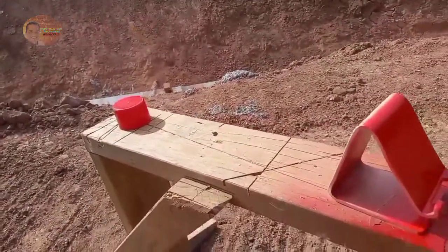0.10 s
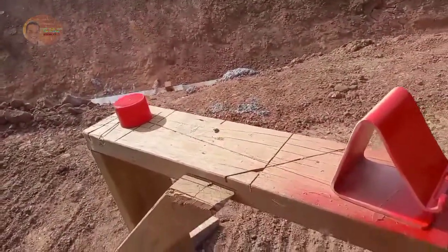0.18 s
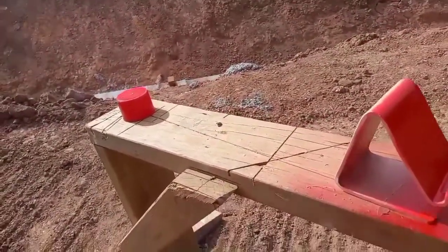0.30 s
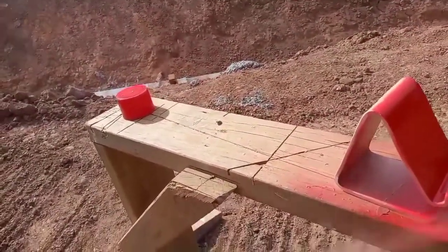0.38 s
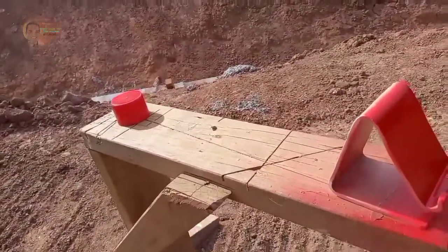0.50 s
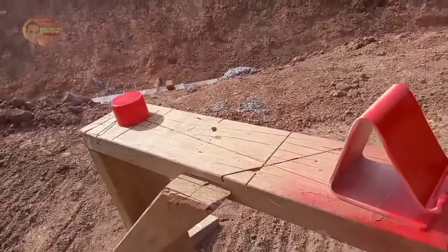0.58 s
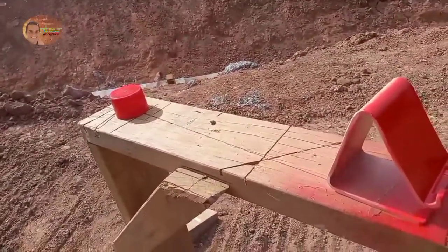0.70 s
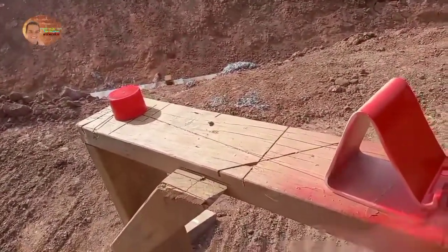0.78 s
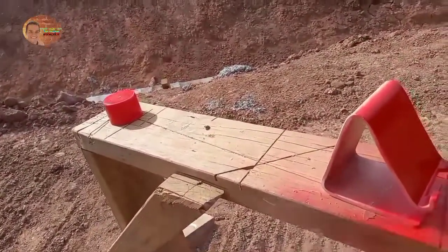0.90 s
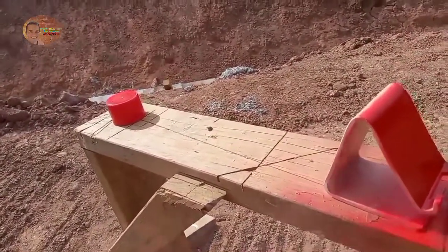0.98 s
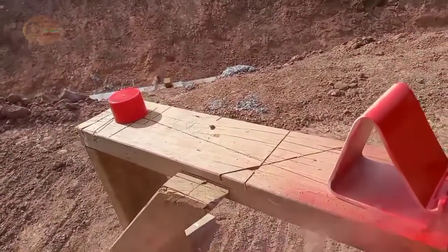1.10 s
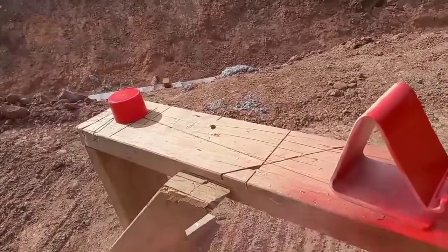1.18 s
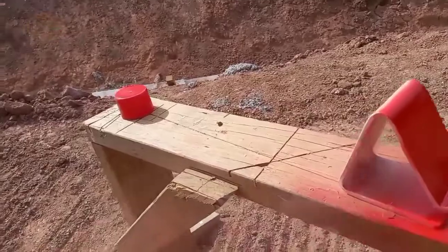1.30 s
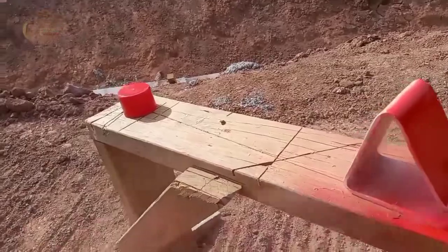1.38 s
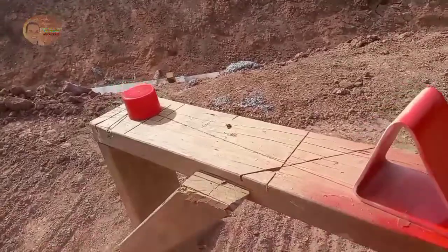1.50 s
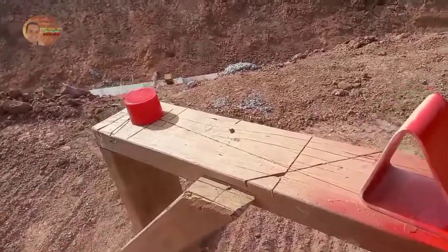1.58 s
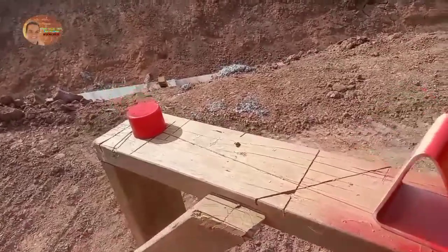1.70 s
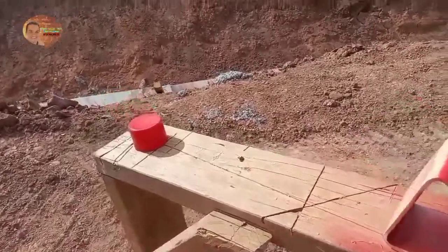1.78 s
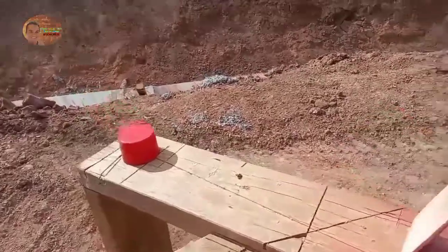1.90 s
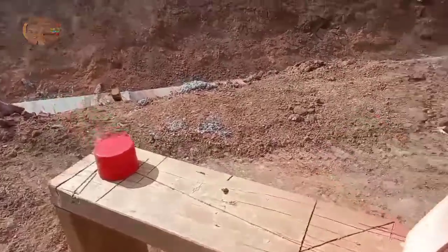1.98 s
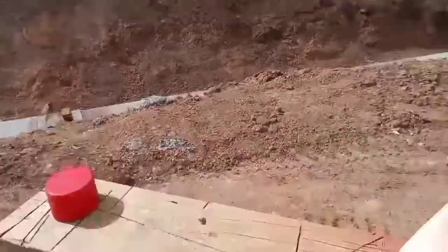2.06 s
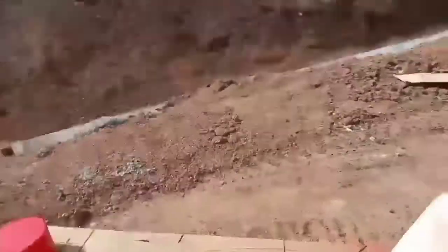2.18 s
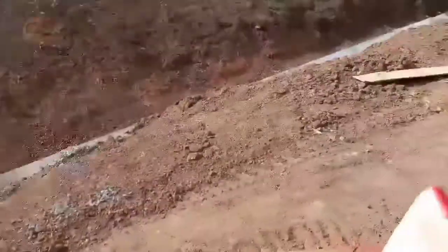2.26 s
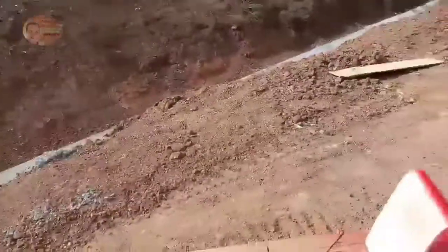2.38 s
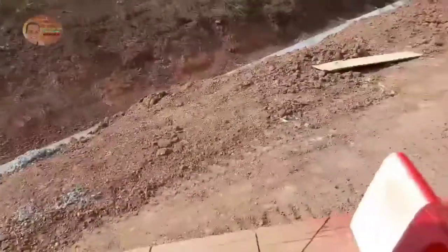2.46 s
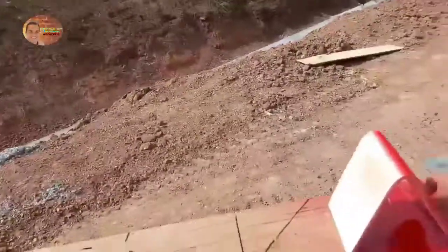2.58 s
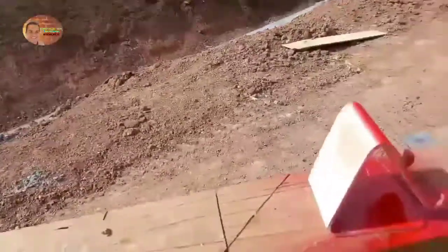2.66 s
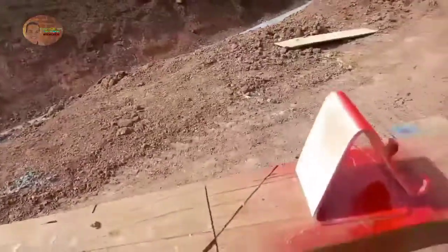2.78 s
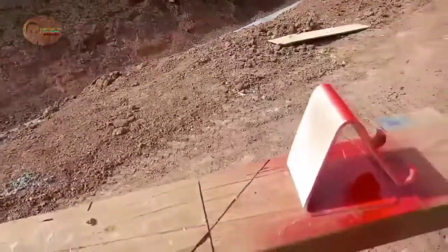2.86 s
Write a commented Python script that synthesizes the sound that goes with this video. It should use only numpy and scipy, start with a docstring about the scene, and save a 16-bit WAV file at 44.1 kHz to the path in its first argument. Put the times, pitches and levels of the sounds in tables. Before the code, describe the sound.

An aerosol paint can hisses in one long bright burst, then rattles as footsteps crunch over dirt.

```python
"""Quiet open air and faint wind come first; then an aerosol can sprays one long burst close on the right.
The jet is shaped turbulent noise; the mixing ball ticks in the can by exciting the modes of its shell.
Then the painter moves over dry dirt: the can rattles and short decaying grains make grit crunch underfoot.
Wind bumps both microphone ports of a hand-held camera as low noise, ruffle and short pressure pulses."""
import sys
import numpy as np
from scipy import signal
from scipy.fft import rfft, irfft, next_fast_len
from scipy.io import wavfile
from scipy.ndimage import uniform_filter1d, map_coordinates

SR = 44100
rng = np.random.default_rng(int(sys.argv[2]) if len(sys.argv) > 2 else 0)


def transcribe(signal):
    """Save signal, clipped to [-1, 1], as a 16-bit WAV file at the path in sys.argv[1]."""
    frames = np.atleast_2d(signal).T
    limited = np.clip(frames, -1, 1)
    pcm = np.round(limited * 32767).astype(np.int16)
    wavfile.write(sys.argv[1], SR, pcm)


N = 130095


def amp(db):
    """Level in decibels to amplitude ratio: 20 dB is a factor of ten."""
    return 10 ** (np.asarray(db) / 20)


def unit(x):
    """Normalisation to a root-mean-square value of 1."""
    return x / np.sqrt(np.mean(x ** 2) + 1e-20)


def along(points, hz):
    """Interpolation of (Hz, value) points on a logarithmic frequency axis."""
    f, v = np.transpose(points)
    return np.interp(np.log(hz + 1), np.log(f + 1), v)


def curves(rows, outside=None):
    """Linear interpolation in time: one value per sample for each column after the time."""
    s, *columns = np.transpose(rows)
    t = np.arange(N) / SR
    return [np.interp(t, s, column, outside, outside) for column in columns]


def wobble(rate):
    """Slow random modulation: a spline through rate random knots a second."""
    knots = rng.standard_normal(int(N * rate / SR) + 4)
    return map_coordinates(knots, [np.arange(N) * rate / SR])


def filtered(x, response):
    """Linear filtering: the spectrum is multiplied by a response of frequency."""
    m = next_fast_len(N + 8192)
    return irfft(rfft(x, m) * response(np.fft.rfftfreq(m, 1 / SR)), m)[..., :N]


def rush(spectrum, alike, patchy_db):
    """Shaped noise of rms 1: mid and side mixed to a set coherence, with patches of random gain."""
    z = signal.stft(rng.standard_normal((2, N)), nperseg=512)[2]
    field = uniform_filter1d(rng.standard_normal(z.shape[1:]), size=4, axis=0)
    field = uniform_filter1d(field, size=14, axis=1)
    pair = signal.istft(z * amp(patchy_db * unit(field)), nperseg=512)[1][:, :N]

    def response(hz):
        # cos^2 - sin^2 of this angle equals the left-right likeness
        angle = np.arccos(np.clip(along(alike, hz), -1, 1)) / 2
        return amp(along(spectrum, hz)) * [np.cos(angle), np.sin(angle)]

    mid, side = filtered(pair, response)
    return unit(np.array([mid + side, mid - side]))


def air():
    """Diffuse background: the quiet open air is noise with little coherence at most pitches."""
    # background spectrum: (f/Hz, relative spectral level/dB)
    colour = [(120, 1), (250, -5.5), (440, -1), (520, -8), (800, -20), (2500, -18.5), (5000, -16),
              (6800, -13.5), (7500, -23.5), (11000, -26.5), (15500, -32)]
    # background strength: (t/s, level/dB)
    strength = [(0, -63.5), (1.5, -57.5), (2.95, -65)]
    noise = rush(colour, [(200, 0.51), (700, 0.041), (9000, .1)], patchy_db=1)
    return amp(curves(strength)[0]) * noise * amp([[-1.5], [1.5]])


def wind():
    """Flow noise: eddies thump each port separately near its resonance, with ruffle and sharp bumps."""
    # gust strength: (t/s, relative level/dB, left over right/dB)
    gust_rows = [(0.0, -63, 2), (0.66, -59.5, 1.5), (0.75, -49, -6), (0.89, -53, 17), (0.99, -59, -16),
                 (1.08, -39.5, -20), (1.12, -29, -23), (1.17, -40, 0), (1.26, -36.5, -24), (1.28, -29.5, 6),
                 (1.32, -25.5, 3), (1.4, -32, 8), (1.43, -21.5, 8), (1.51, -27.5, -4.5), (1.56, -29.5, 2.5),
                 (1.61, -28, -5.5), (1.69, -36, 6.5), (1.73, -47, -12), (1.79, -25, 6), (1.83, -33, -13),
                 (1.93, -34, 25), (1.96, -38, -12), (2.01, -27, 21), (2.05, -27, -3.5), (2.09, -24.5, 9),
                 (2.18, -32, -17), (2.21, -33.5, -15), (2.25, -40.5, 32), (2.29, -39.5, -4),
                 (2.37, -48, -9), (2.41, -67.5, -6), (2.68, -53, 13), (2.76, -66, -1), (2.95, -62.5, -1)]
    # thump at the port resonance: (f/Hz, relative spectral level/dB)
    thump_colour = [(12, -54), (20, -54), (52, 0), (81, 8.5), (130, -8), (200, -30.5), (260, -30),
                    (440, -120)]
    # rougher noise above it: (f/Hz, relative spectral level/dB)
    ruffle_colour = [(90, -38), (130, 9), (250, -6.5), (400, -20.5), (700, -64)]
    # pressure bumps: (t/s, relative peak level/dB, share on the right port/0-1)
    bumps = [(1.321, -25, 0.9), (1.354, -23.5, 0), (1.42, -26, 0), (1.453, -33, 0), (1.761, -32.5, 1),
             (1.787, -33, 0.4), (1.852, -25.5, 0.64), (1.914, -23.5, 0.4), (2.003, -31.5, 0.4),
             (2.072, -21, 0.9), (2.079, -22, 0), (2.102, -8.5, 0.1), (2.123, -21, 0.9), (2.178, -27, 0.3)]
    ruffle_db, ruffle_growth = -13.5, 1.13  # level at the strongest gust; dB per dB of thump
    bump_s, bump_db = 0.00099, -4.5  # half width to the zero crossing; layer gain
    steadiness = 0.3  # exponent evening out the thump's envelope

    strength_db, pan_db = curves(gust_rows)
    port_db = strength_db + pan_db * np.array([[.5], [-.5]]) + 2.5 - np.abs(pan_db) * 0.3
    thump = rush(thump_colour, [(80, 0.0053)], patchy_db=0.7)
    envelope = np.abs(signal.hilbert(thump))
    thump = unit(thump / (envelope + 0.49) ** steadiness)

    flutter_db = 4 * np.array([wobble(29.74), wobble(29.8)])
    ruffle = unit(amp(flutter_db) * rush(ruffle_colour, [(80, 0.0041)], patchy_db=0.3))
    peak_db = port_db.max()
    ruffle_level_db = ruffle_growth * (port_db - peak_db) + peak_db + ruffle_db
    out = amp(port_db) * thump + amp(ruffle_level_db) * ruffle
    for s, db, right in bumps:
        u = ((np.arange(N) / SR - s) / bump_s) ** 2
        pulse = (1 - u) * np.exp(-u / 2)
        out = out + amp(db + bump_db) * pulse * np.clip([[1 - right], [right]], 0, 1)
    return out


def spray():
    """Jet noise: a bright turbulent jet from the nozzle and a duller wash where the mist lands."""
    # the burst: (t/s, relative jet level/dB, relative wash level/dB); the wash lingers;
    # the last rows are a faint dull rustle near 800 Hz, as of someone moving
    burst = [(.185, -71, -93), (.21, -45.5, -80), (.28, -39.5, -57.5), (.43, -37, -51), (.55, -40.5, -55),
             (.75, -38, -59), (.9, -39.5, -49.5), (1.19, -39, -53), (1.33, -41, -47.5),
             (1.385, -41.5, -50.5), (1.416, -48, -61.5), (1.435, -65, -52.5), (1.48, -74, -55.5),
             (1.54, -84, -62.5), (1.63, -91, -73), (1.77, -95, -63), (1.84, -95, -74)]
    # jet spectrum: (f/Hz, relative spectral level/dB)
    jet_colour = [(1500, -19), (2500, -3), (3600, -5.5), (4500, -3.5), (5500, -3), (6800, -0.5),
                  (7600, -5.5), (8600, -4.5), (9700, -2), (12500, 3.5), (14500, -0.5), (15500, -2)]
    # spectrum of wash and dull rustle: (f/Hz, relative spectral level/dB)
    wash_colour = [(150, -51), (250, -7), (620, -8.5), (820, -4.5), (1040, -10), (1320, -0.5), (2200, -8.5),
                   (2860, -21), (4840, -120)]
    # low band of the jet: (t/s, relative level/dB)
    body_rows = [(0.2, -69), (0.27, -45), (0.388, -41.5), (0.426, -43.5), (1.178, -63), (1.254, -49),
                 (1.43, -62)]
    # low band spectrum: (f/Hz, relative spectral level/dB)
    body_colour = [(1200, -31), (1700, -16), (2200, 4), (2900, -6), (3800, -33)]
    # coherence of the ports: (f/Hz, left-right likeness/0-1)
    likeness = [(300, 0.85), (1000, 0.82), (2500, 0.5), (5000, 0.64), (10000, 0.74), (15000, 0.33)]
    # direction: (f/Hz, left over right/dB)
    side_db = [(60, -22), (180, -7), (550, -11.5), (1650, -4.0), (4970, -1), (15000, -5.5)]

    jet_db, wash_db = curves(burst, outside=-120)
    body_db, = curves(body_rows, outside=-120)
    jet = amp(jet_db + 6.5 + 0.88 * wobble(38.76)) * rush(jet_colour, likeness, patchy_db=1.8)
    body = amp(body_db + 2.5) * rush(body_colour, likeness, patchy_db=7.0)
    wash = amp(wash_db + 5 + 1.12 * wobble(25.1)) * rush(wash_colour, likeness, patchy_db=2.5)
    return filtered(jet + body + wash, lambda hz: amp(along(side_db, hz) * [[.5], [-.5]]))


def ball():
    """Modal excitation: chattering contacts ring the shell, and the ports hear slightly different mixes."""
    # ticks: (t/s, relative level/dB, left over right/dB, low modes over high/dB,
    #         favoured pitch f/Hz, time for the chatter to fall 60 dB/ms)
    ticks = [(0.7567, -27, -8.5, -4.8, 2690, 9), (0.7588, -32.5, -6, -21, 4860, 5),
             (0.7818, -33.5, -5, -2, 2540, 5), (0.825, -26, -9, -14, 4050, 5.4),
             (0.8362, -21, -7.5, 1.5, 3360, 3.8), (0.8388, -18.5, -5, -9.5, 3300, 3.6),
             (0.843, -26, 12, -13, 6800, 4.8), (1.0503, -31.5, -9, -3.5, 6560, 6),
             (1.1722, -18.5, -7, -2, 3600, 2.2), (1.1744, -16.5, -3.5, -4, 3820, 7.2),
             (1.1849, -18.5, -6, -10, 6900, 6), (1.1957, -25, -5, -2.5, 3760, 9.1),
             (1.2624, -31, -1, -7, 12489, 4.7), (1.2946, -43, -13, 5.1, 8100, 7.5),
             (1.3207, -32.5, -8, 10, 2583, 8.1), (1.8927, -27, -4, -0.5, 2660, 4.8),
             (1.9355, -32, -5.5, 7.5, 3020, 9.2), (1.9642, -36.5, -3.5, 2, 2500, 5),
             (1.99, -40.5, -7.4, -1, 3445, 6), (1.9952, -42, -5.7, -6, 2540, 3.8),
             (2.0048, -43, -4.7, 1, 3746, 6), (2.0492, -19.5, -10, -19, 4380, 6.9),
             (2.0541, -25.5, -5.5, -1, 4440, 5.4), (2.084, -35, -7.5, 4, 2540, 6.7),
             (2.113, -34.5, -5.5, 6.5, 2540, 11), (2.1388, -34, -6, -6.5, 6500, 6),
             (2.2, -42.5, -11, -13, 5500, 4), (2.2846, -23, -13.5, -9.5, 6201, 6.2),
             (2.3635, -34, -5.5, -4, 2930, 7.7), (2.3659, -29, -6, -9, 4800, 6.8),
             (2.4262, -17.5, -6, -12, 6140, 6.7), (2.4461, -37.5, -11.5, -2, 9600, 6),
             (2.47, -39, -5.0, -12, 6287, 6.6), (2.4767, -32.5, 4, -1, 3100, 6),
             (2.4812, -34.5, -6, -5, 5650, 5.2), (2.5613, -34, 0, -5, 6440, 4.8),
             (2.5815, -48, -3, -22.6, 4005, 6), (2.5876, -41.5, -3, 5, 2540, 6.6),
             (2.6519, -23.5, -5, -16, 6500, 7.9), (2.6654, -35.5, -2, -5.9, 3200, 5.1),
             (2.6681, -36.5, -6, -5, 6760, 6.6), (2.6897, -38.5, -7, -7, 3919, 4.8),
             (2.697, -35.5, -2, -32, 6700, 6), (2.7086, -37.5, -6.2, -4, 5200, 6),
             (2.7244, -33.5, -5, -15, 6230, 8.2), (2.7417, -39, 0.9, -11, 2800, 6),
             (2.7454, -37.9, -8, -23, 2800, 6), (2.7536, -35.5, -3, -18, 5000, 13),
             (2.7694, -42.5, -2.6, -6, 3703, 8.3), (2.7808, -41, 2, -6, 6200, 4.7),
             (2.79, -49, 9, -6, 6100, 5), (2.8251, -42.5, 1, -11, 5900, 5.3),
             (2.875, -52, -3.9, 0, 2540, 6.6), (2.8884, -37, -2.5, -12, 6070, 9.4),
             (2.9016, -37, -4, 5.5, 2670, 6), (2.916, -40.5, 1, -1, 2540, 8.3),
             (2.9383, -48, 10, -5.2, 3248, 6)]
    # shell modes: (nominal f/Hz, relative level/dB, 60 dB decay time/s)
    shell = [(860, 0.5, 0.03), (1360, 3, 0.025), (1602, 10.5, 0.016), (2004, 9, 0.029),
             (2630, -1.5, 0.0043), (3580, -13, 0.011), (4074, -5, 0.024), (4610, 1.5, 0.02),
             (5830, 4.5, 0.0092), (6630, 4, 0.01), (9970, 6, 0.01), (10440, -5, 0.0064),
             (12100, -13, 0.005)]
    # the hand shifts on the can: (t/s, favoured low pitch f/Hz)
    grip = [(1.4, 1050), (1.89, 1480), (1.93, 1990), (2.15, 2000), (2.25, 1420)]
    split_hz, rise_s = 2540, 0.0002  # border of low and high modes; onset of the contacts
    favour_db, grip_db = 11, 16  # loss per octave from the favoured pitch: high modes, low modes
    scatter_db, port_scatter_db = 2, 2.4  # random mode level: common to the ports, separate
    tick_db, crack_db = -2, 0  # layer gain; crack over high modes
    crack_cycles = 1.6  # sets the decay of the crack's filter: fewer is broader

    out, t = np.zeros((2, N + SR)), np.arange(SR // 25) / SR
    hz, level, t60 = np.transpose(shell)[..., None]
    low = hz < split_hz
    for s, db, pan_db, low_db, centre_hz, chatter_ms in ticks:
        grip_hz = np.interp(s, *np.transpose(grip))
        high_loss = favour_db * np.abs(np.log2(hz / centre_hz)) * ~low
        low_loss = grip_db * np.abs(np.log2(hz / grip_hz)) * low
        mix = level - high_loss - low_loss + scatter_db * rng.standard_normal(hz.shape)
        mix = mix + port_scatter_db * rng.standard_normal((2, len(hz), 1))
        detune = 1 + 0.04 * rng.standard_normal(hz.shape)
        modes = amp(mix - 60 * t / t60) * np.sin(2 * np.pi * hz * detune * t)

        # cubed noise is sparse, like separate contacts
        fade = amp(-60000 * t / max(chatter_ms, 1)) * (1 - np.exp(-t / rise_s))
        chatter = fade * rng.standard_normal(len(t)) ** 3
        groups = np.array([(modes * low).sum(axis=1), (modes * ~low).sum(axis=1)])
        bass, treble = signal.fftconvolve(groups, chatter[None, None], axes=2)[..., :len(t)]

        # the crack is a noise burst around the favoured pitch
        band = np.sin(2 * np.pi * centre_hz * t) * np.exp(-t * centre_hz / crack_cycles)
        noise = rng.standard_normal((2, len(t)))
        crack = np.sqrt(fade) * signal.fftconvolve(noise, band[None], axes=1)[:, :len(t)]
        thin = signal.butter(3, max(split_hz, .7 * centre_hz), "high", fs=SR, output="sos")
        parts = np.array([bass, *signal.sosfilt(thin, [treble, crack])])

        # equal rms over the first 150 samples before mixing
        bass, treble, crack = parts / np.sqrt(np.mean(parts[..., :150] ** 2, axis=2, keepdims=True))
        high = (treble + amp(crack_db) * crack) / np.hypot(1, amp(crack_db))
        tick = (amp(low_db) * bass + high) / np.hypot(1, amp(low_db))
        gain = amp(db + tick_db + pan_db * np.array([[.5], [-.5]]))
        out[:, round(s * SR):][:, :len(t)] += gain * tick
    return filtered(out[:, :N], lambda f: 1 / (1 + (650 / (f + 1)) ** 6))


def grit():
    """Granular impact noise: dense short damped grains over a rustle, swelling as a shoe scuffs."""
    # grit and cloth while moving: (t/s, relative level/dB)
    scuffs = [(1.5, -83), (1.7, -61), (1.77, -64.5), (1.82, -66), (1.88, -48.5), (1.93, -53), (2.05, -54.5),
              (2.16, -52), (2.26, -59.5), (2.31, -52.5), (2.41, -57.5), (2.465, -56.5), (2.485, -42.5),
              (2.532, -40), (2.555, -49), (2.61, -62.5), (2.645, -65), (2.68, -57.5), (2.75, -55.5),
              (2.8, -56), (2.87, -65.5), (2.895, -60), (2.92, -51.5), (2.96, -53)]
    grains_per_s, median_hz, spread = 1500, 1050, 0.6  # spread in natural-log units of frequency
    grain_cycles, grain_db = 1.8, 3  # decay in cycles; level scatter
    growth = 1.53  # grains swell faster than the rustle under them, dB per dB

    count = int(grains_per_s * N / SR)
    u, g, k = rng.random((count, 2)), rng.standard_normal((count, 1)), np.arange(256)
    hz = np.clip(median_hz * np.exp(spread * g), 280, 9000)
    decay = np.exp(-k * hz / SR / grain_cycles)
    shape = amp(-grain_db * np.log(u[:, 1:])) * decay * np.sin(2 * np.pi * hz * k / SR)
    places = (u[:, :1] * N).astype(int) + k
    grains = unit(np.bincount(places.ravel(), shape.ravel())[:N])

    level_db = curves(scuffs, outside=-120)[0] + 2.63 * wobble(65)
    grains_db = level_db.max() + growth * (level_db - level_db.max())
    rustle_colour = [(300, -32), (1400, 2.5), (4000, -5.0), (7000, -8.5), (9000, -12.5), (15000, -15)]
    rustle = rush(rustle_colour, [(1000, 0.088)], patchy_db=0.5)
    return (amp(grains_db + 2.0) * grains + amp(level_db - 0.5) * rustle) * amp([[-2.5], [2.5]])


def placed(pair):
    """Time difference of arrival: sound from the right reaches the left port later."""
    # where the can is: (t/s, lag of the left port/ms)
    lag_rows = [(0, 0.37), (.4, 0.26), (.6, 0.33), (.75, 0.27), (.85, 0.32), (1.08, 0.28), (1.3, .32),
                (1.4, 0.28), (2.25, 0.31), (2.35, 0.29), (2.6, 0.16), (2.8, 0.16)]
    lag_ms, = curves(lag_rows)
    left = map_coordinates(pair[0], [np.arange(N) - lag_ms * SR / 1000], order=5)
    return np.array([left, pair[1]])


def scene():
    """Superposition: the delayed sources add to the wind and the open air."""
    return air() + wind() + placed(spray() + ball() + grit())


def record(dry):
    """Band limiting: the sound is closed above 15480 Hz and has little of the deepest bass."""
    return filtered(dry, lambda hz: (hz < 15480) / (1 + (39 / (hz + 1)) ** 4))


dry = scene()
out = record(dry)
transcribe(out)
```